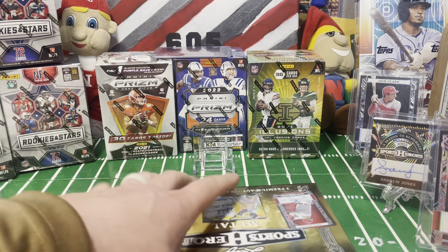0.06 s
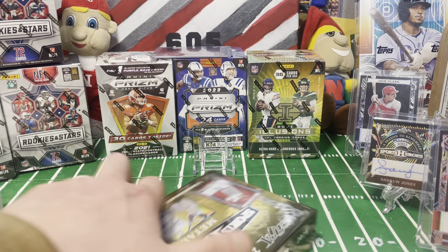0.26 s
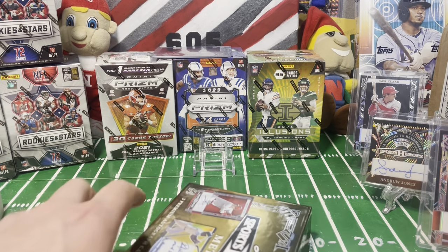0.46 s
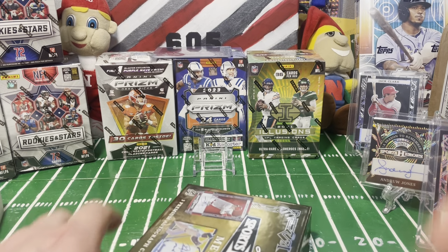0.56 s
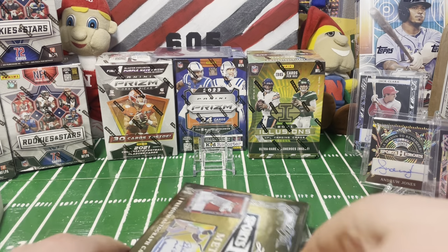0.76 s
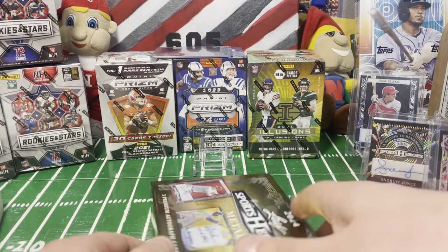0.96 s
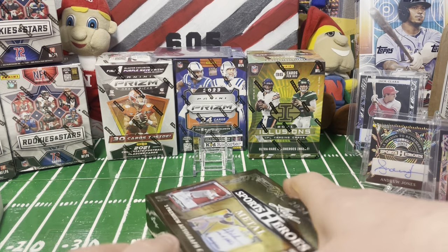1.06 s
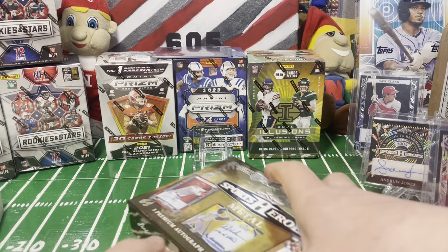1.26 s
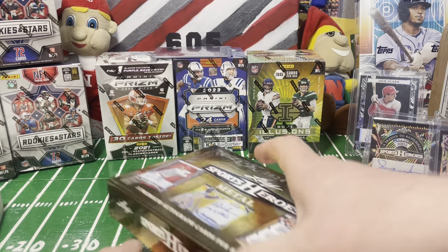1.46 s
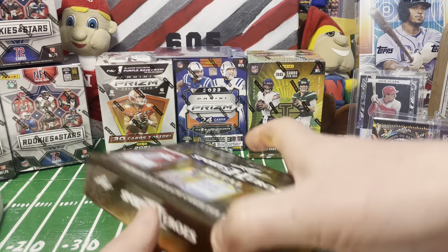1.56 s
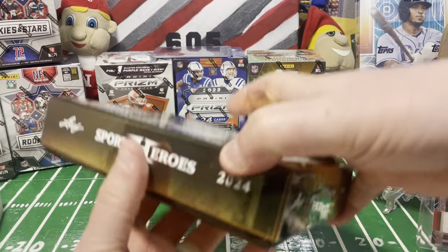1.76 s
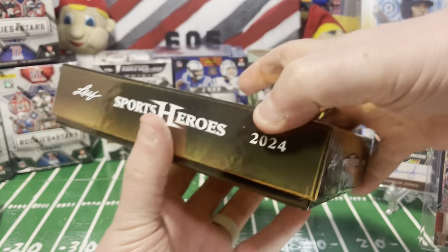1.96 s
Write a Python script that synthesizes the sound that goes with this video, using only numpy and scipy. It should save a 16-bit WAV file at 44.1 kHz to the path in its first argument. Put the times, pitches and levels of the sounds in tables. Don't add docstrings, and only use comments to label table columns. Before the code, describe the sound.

Close indoor handling of a wrapped cardboard box: a rough drag with dull knocks and snapping film, a short lull, a second scrape ending in firmer thumps, then quiet finger rubs and soft table thuds.

```python
import sys
import numpy as np
from scipy import signal
from scipy.fft import rfft, irfft, next_fast_len
from scipy.io import wavfile
from scipy.ndimage import map_coordinates

SR = 44100
rng = np.random.default_rng(int(sys.argv[2]) if len(sys.argv) > 2 else 0)


def undo_db(level):
    steps = np.asarray(level, float) / 20
    return 10 ** steps


def transcribe(u):
    v = np.clip(np.atleast_2d(u).T, -1, 1)
    q = np.round(v * 32767).astype(np.int16)
    wavfile.write(sys.argv[1], SR, q)


N = 88200
TIME = np.arange(N) / SR


def unit(x):
    return x / np.sqrt(np.mean(x ** 2) + 1e-20)


def along(points, hz):
    f, v = np.transpose(points)
    return np.interp(np.log(hz + 1), np.log(f + 1), v)


def curves(rows):
    s, *cols = np.transpose(rows)
    return [np.interp(TIME, s, c) for c in cols]


def wobble(rate):
    knots = rng.standard_normal(int(N * rate / SR) + 4)
    return map_coordinates(knots, [np.arange(N) * rate / SR])


def filtered(x, response):
    m = next_fast_len(N + SR // 4)
    return irfft(rfft(x, m) * response(np.fft.rfftfreq(m, 1 / SR)), m)[..., :N]


def resonances(modes):
    def response(f):
        total = 0
        for k, (hz, width, db) in enumerate(modes):
            peak = 1j * f * width / (hz * hz - f * f + 1j * f * width)
            total = total + (-1) ** k * undo_db(db) * peak
        return total
    return response


def grit(per_s, spread_db):
    chance, sign, size = rng.random((3, N))
    slips = (chance < per_s / SR) * np.sign(sign - .5)
    return unit(slips * undo_db(-spread_db * np.log(size + 0.00061)))


def add(x, s, piece):
    i = round(s * SR)
    x[i:i + len(piece)] += piece[:len(x) - i]


# time in seconds, strength in dB, brightness of the edge in dB.
DRAG_STROKES = [(0, -69, 4.5), (.085, -60.5, -21), (.125, -39.5, -8.5), (.2, -46.5, -11), (.25, -45.5, -2),
                (.34, -42.5, -8), (.44, -58, -9.5), (.53, -53.5, -55), (.57, -81.5, -7), (.69, -67.5, -4.5),
                (.79, -48, -9.5), (.9, -44.5, -9), (1.04, -51.5, -57), (1.17, -62.5, -11),
                (1.22, -78.5, -11), (1.45, -82.5, -4), (1.62, -66.5, -9.5), (2, -66.5, -6.5)]
# pitch in Hz, width in Hz, level in dB.
BOX_TONES = [(185, 400, -22.5), (346.3, 87.4, 5.5), (495, 31, -5), (657, 123, -13.5)]
# pitch in Hz, width in Hz, level in dB.
EDGE_TONES = [(606, 283, -3.5), (934, 175, 2.5), (1267, 126, -5), (1473, 118, -6), (2470, 1540, -19.5)]


def scrape():
    drag_db, edge_db = curves(DRAG_STROKES)
    slips = grit(per_s=2200, spread_db=3) * undo_db(drag_db + 0.81 * wobble(40.42))
    soft = filtered(slips, lambda f: 1 / (1 + 1j * f / 900) ** 2)
    palm = np.clip((0.45 - TIME) / 0.032, .15, 1)
    boom = undo_db(6.5) * filtered(soft * palm, resonances([(128.6, 14, 0)]))
    box = filtered(soft, resonances(BOX_TONES))
    edge = filtered(slips * undo_db(edge_db), lambda f: resonances(EDGE_TONES)(f) / (1 + 1j * f / 3000))
    return 9 * (box + boom) + 9 * edge


# time in seconds, level in dB.
TABLE_SHAKE = [(0, -54), (.15, -51.5), (.4, -59.5), (.6, -60), (.78, -51), (.95, -55.5), (1.1, -53.5),
               (1.22, -69), (1.32, -62), (1.43, -69), (1.6, -60.5), (2, -55)]
# frequency in Hz, level in dB per Hz.
TABLE_COLOUR = [(20, -29), (55, 11.5), (90, -1.5), (150, -3), (300, -12), (500, -25.5), (900, -44)]
# time in seconds, peak in dB, pitch in Hz.
TABLE_PUSHES = [(.027, -33.5, 68.6), (0.063, -31, 81), (0.244, -31.5, 102), (0.665, -49, 53.3),
                (0.783, -40.5, 57), (1.76, -44, 84), (1.792, -36, 91), (1.805, -34, 99),
                (1.843, -39.5, 54.4), (1.866, -55, 55), (1.918, -56, 89.5), (1.938, -45.5, 58.3),
                (1.96, -40.5, 71.5), (1.988, -34.5, 105), (1.998, -27.5, 107)]


def table_thuds():
    shake_db, = curves(TABLE_SHAKE)
    rumble = unit(filtered(rng.standard_normal(N), lambda f: undo_db(along(TABLE_COLOUR, f))))
    out = rumble * undo_db(shake_db + 1.5 * wobble(13.8))
    for s, db, hz in TABLE_PUSHES:
        swing = np.cos(2 * np.pi * hz * (TIME - s))
        out = out + undo_db(db) * swing * np.exp(-((TIME - s) * hz / 0.57) ** 2)
    return out


# time in seconds, level in dB.
SKIN_BRUSH = [(0, -69), (.08, -75.5), (.12, -54.5), (.4, -62.5), (.44, -65.5), (.52, -61), (.6, -73.5),
              (.695, -83), (.708, -68), (.79, -61), (1.15, -66), (1.19, -76), (1.25, -78), (1.27, -84),
              (1.46, -84), (1.6, -80), (1.615, -65.5), (2, -62.5)]
# frequency in Hz, level in dB per Hz.
SKIN_COLOUR = [(600, -35), (1500, 0), (3000, -1), (5000, -1), (7000, -0.5), (11000, -1.5), (13500, -6.5),
               (16000, -3.5)]
# middle in seconds, length in seconds, level in dB, pitch in Hz, width in Hz.
FINGER_SQUEAKS = [(0.014, 0.33, -63, 1720, 230), (0.016, 0.12, -69.5, 2420, 770),
                  (1.238, 0.025, -78.5, 5750, 715), (1.637, 0.042, -61.5, 6900, 2000),
                  (1.73, 0.32, -75, 1640, 52), (1.75, 0.019, -62, 960, 180), (2.1, 0.014, -59, 900, 180),
                  (1.28, 0.015, -78, 920, 150), (0.66, 0.21, -74, 2340, 400),
                  (0.72, 0.26, -77.5, 1800, 500), (0.87, 0.008, -42, 960, 270),
                  (0.837, 0.0069, -35, 1040, 480)]


def fingers():
    brush_db, = curves(SKIN_BRUSH)
    fine = rng.standard_normal(N) + .5 * grit(per_s=1200, spread_db=3)
    hiss = unit(filtered(fine, lambda f: undo_db(along(SKIN_COLOUR, f))))
    out = hiss * undo_db(brush_db + 1.3 * wobble(70))
    for s, length, db, hz, width_hz in FINGER_SQUEAKS:
        band = unit(filtered(rng.standard_normal(N), lambda f: resonances([(hz, width_hz, 0)])(f) ** 2))
        swell = np.exp(-((TIME - s) / length * 2) ** 2)
        out = out + band * undo_db(db + 1.1 * wobble(60.86)) * swell
    return out


# time in seconds, peak in dB, lower treble in dB, length in milliseconds.
FILM_SNAPS = [(0.0885, -45.5, -9, 3.2), (0.092, -44, -23, 2.2), (0.096, -47, -24, 2.9),
              (0.1169, -32, -15, 3.1), (0.138, -49, -24, 1.2), (0.1503, -41, -26, 3),
              (0.156, -33, -38, 1.6), (0.1596, -38, -26, 1.6), (0.179, -56, -18, 0.93),
              (0.197, -39, -38, 2.4), (0.2247, -36.5, -14.5, 4.9), (0.231, -42.5, -7, 5.9),
              (0.2494, -39.5, -10, 3.7), (0.2864, -25.5, -14, 3.1), (0.283, -34, -3, 1.8),
              (0.2958, -29.5, -29, 5.1), (0.3705, -43.5, -3, 4.7), (0.376, -48.5, 2, 2.4),
              (0.4014, -36.5, -14, 5.4), (0.4112, -47, -22, 1.8), (0.425, -53.5, -1, 2.7),
              (0.4619, -38.5, -27, 1.7), (0.4756, -44, -13.5, 6.9), (0.488, -41.5, -12, 5.3),
              (0.5009, -30.5, -19.5, 2.3), (0.5072, -32.5, -22, 2.4), (0.514, -39, -34, 1.6),
              (0.5206, -46, -15, 2.2), (0.7064, -59, 0.5, 2), (0.7274, -56, -4, 1.7),
              (0.7437, -44.5, -5, 1.6), (0.7668, -30.5, -23, 2.9), (0.7955, -52.5, 5, 3),
              (0.81, -61, -4, 2), (0.823, -64, -4, 1.5), (0.83, -65, -2, 1.5), (0.8578, -58, 1, 2.5),
              (0.994, -53, -6, 0.97), (1.481, -65.5, -1.5, 1.7), (1.61, -67, -5, 1.8), (1.728, -63, 5, 2.5)]
# pitch in Hz, width in Hz, level in dB.
FILM_HIGH_TONES = [(10500, 2340, -3.5), (13500, 2800, -16)]
# pitch in Hz, width in Hz, level in dB.
FILM_LOW_TONES = [(3070, 950, -2.5), (5250, 830, 1.5), (7340, 1400, 0)]


def ticks():
    high, low = np.zeros((2, N))
    t = np.arange(-SR // 100, SR // 60) / SR
    for s, db, low_db, ms in FILM_SNAPS:
        rate = 2500 * np.where(t < 0, 1.6, .85) / max(ms, .3)
        burst = undo_db(db + 8.0) * np.exp(-np.abs(t) * rate) * rng.standard_normal((2, len(t)))
        start = s + t[0] + .0012
        add(high, start, burst[0])
        add(low, start, burst[1] * undo_db(low_db + 2.0))
    bright = filtered(high, lambda f: resonances(FILM_HIGH_TONES)(f) / (1 + (f / 13500) ** 8))
    return bright + filtered(low, resonances(FILM_LOW_TONES))


# time in
# seconds, peak in dB, ring in Hz, edge in dB, time to fade by 60 dB in milliseconds.
BOX_KNOCKS = [(0.093, -39, 260, -16.5, 38), (.122, -42, 510.4, -7, 59), (.163, -30.5, 367, -15.5, 40),
              (.229, -24.5, 416.4, -9.5, 29), (.263, -31, 427, -17, 35), (.324, -27.5, 384, -18, 26),
              (.334, -35, 350, -17, 28), (.376, -24, 380.4, -10, 32), (0.428, -43, 323, -3.5, 24),
              (0.488, -44.5, 307, -19.5, 77), (.581, -61, 285, -11.5, 50), (0.61, -57.5, 288, -26, 47),
              (.754, -36.5, 323, -22.5, 29), (.788, -39.5, 470, -15, 36), (.796, -31, 437, -12.5, 47),
              (0.813, -32.5, 429, -15, 39), (.823, -37.5, 512, -4.5, 52), (.848, -30.5, 426, -15, 26.5),
              (0.873, -30.5, 420, -15.5, 28), (.885, -32.5, 460, -13.5, 43), (.898, -40.5, 449, -16.5, 48),
              (.978, -23.5, 369, -16.5, 33), (.998, -17, 414.5, -19.5, 27), (1.0099, -20.5, 412, -19, 24),
              (1.021, -32, 366, -21, 47), (1.133, -49, 467, -9.5, 70), (1.257, -58.5, 366, -22, 53),
              (1.485, -50.5, 305, -23, 47), (1.601, -52.5, 262, -35, 99), (1.708, -47, 362, -18.5, 50),
              (1.742, -31, 433, -20, 34), (1.755, -42, 337, -20.5, 54), (1.796, -37.5, 209, -36, 45.5),
              (1.843, -53.5, 410, -27, 34), (1.926, -50, 339, -25, 67)]


def knocks():
    ring, slaps, t = np.zeros(N), np.zeros(N), np.arange(SR // 8) / SR
    glide_s = 0.0018
    for s, db, hz, edge_db, t60_ms in BOX_KNOCKS:
        t60 = max(t60_ms, 8) / 1000
        glide = 1.77 * min(undo_db(edge_db + 6.5), 1.5)
        angle = 2 * np.pi * hz * (t + glide * glide_s * (1 - np.exp(-t / glide_s)))
        tone = np.sin(angle) + 0.24 * np.sin(angle * .82 + 6 * rng.random()) + 0.18 * np.sin(angle / 2)
        rise = (1 - np.exp(-t / (.2 * t60))) ** 2
        add(ring, s - .003, undo_db(db + 14.5 - 60 * t / t60) * rise * tone)
        snap = (1 - np.exp(-t / 0.00051)) * (1 + 0.85 * np.exp(-t / 0.00095))
        slap = undo_db(db + edge_db + 19.5 - 60 * t / t60) * snap * rng.standard_normal(len(t))
        add(slaps, s - .003, slap)
    return ring + filtered(slaps, lambda f: resonances(EDGE_TONES)(f) / (1 + 1j * f / 2600) ** 2)


# frequency in Hz, level in dB.
SCATTER = [(60, -12), (400, -14), (800, -8), (1300, -11), (2500, -3), (6000, -9), (7600, -30), (9000, -30),
           (10500, -16), (14000, -14)]
# frequency in Hz, level in dB.
FROM_SIDE = [(6500, -41.5), (7600, -14.5), (8800, 0), (10500, -33), (16000, -21)]


def scene():
    body = scrape() + knocks()
    snaps, skin = ticks(), fingers()
    near = body + snaps + skin + table_thuds()
    z = signal.stft(near, nperseg=1024)[2]
    phase = np.cumsum(.8 * rng.standard_normal(z.shape), 0)
    scattered = signal.istft(1j * z * np.exp(1j * phase), nperseg=1024)[1][:N]
    reach = undo_db(3) * np.exp(-((TIME - 0.766) / .12 * 2) ** 4)
    side = 0.32 * snaps + (0.07 + reach) * skin
    unlike = filtered(scattered, lambda f: undo_db(along(SCATTER, f)))
    unlike = unlike + filtered(side, lambda f: undo_db(along(FROM_SIDE, f)))
    return np.array([near + unlike, near - unlike])


def roll_off(x):
    return signal.sosfilt(signal.butter(12, 15900, fs=SR, output="sos"), x)


# frequency in Hz, phase in radians.
PORT_LEAD = [(800, 0), (2500, .8), (5700, -.1), (7450, -2.3), (7800, -3.12), (8550, -3.16), (8900, -3.9),
             (11100, -6.2), (12300, -6.4), (14600, -9.4)]
# frequency in Hz, left over right in dB.
PORT_LEVEL = [(60, .5), (400, 2.3), (1200, 1.2), (3000, 4), (6000, 2.5), (7600, 0)]


def record(dry):
    half = np.array([[.5], [-.5]])

    def ports(f):
        turn = np.exp(1j * half * along(PORT_LEAD, f))
        return turn * undo_db(half * along(PORT_LEVEL, f)) * (f < 15900)

    return roll_off(filtered(dry, ports))


dry = scene()
out = record(dry)
transcribe(out)
```